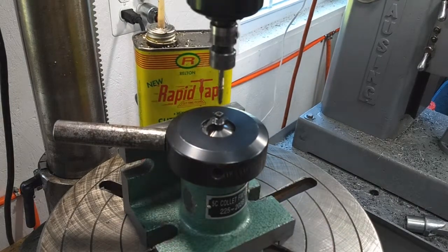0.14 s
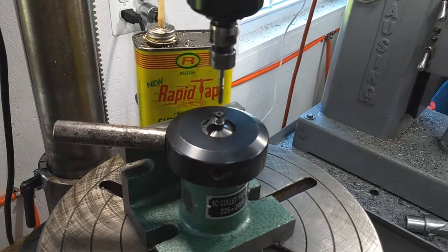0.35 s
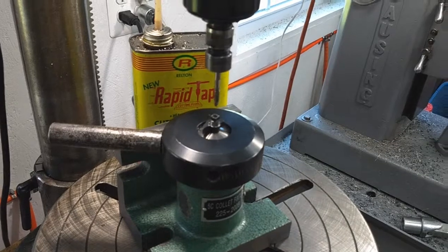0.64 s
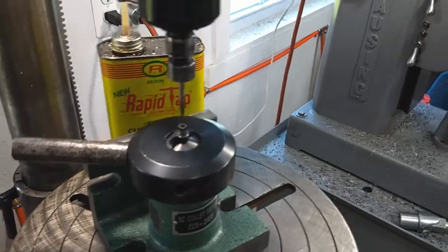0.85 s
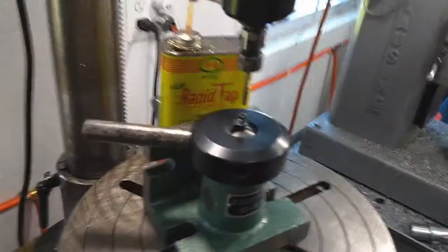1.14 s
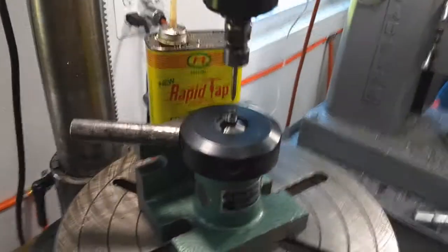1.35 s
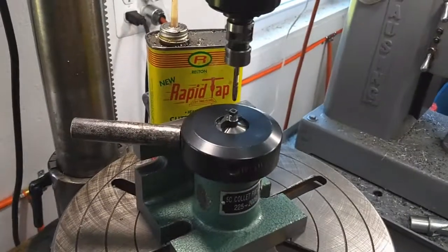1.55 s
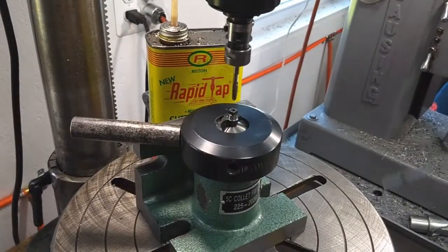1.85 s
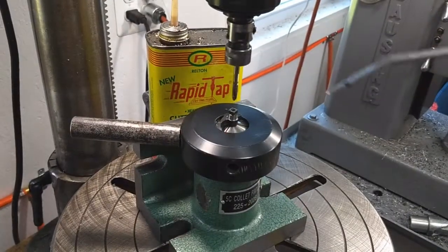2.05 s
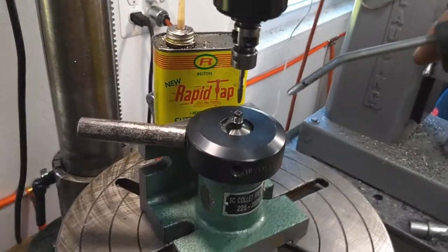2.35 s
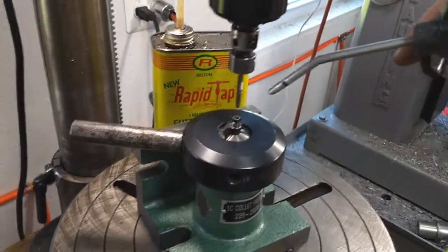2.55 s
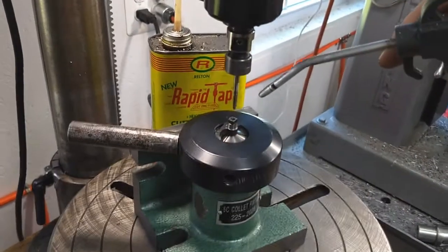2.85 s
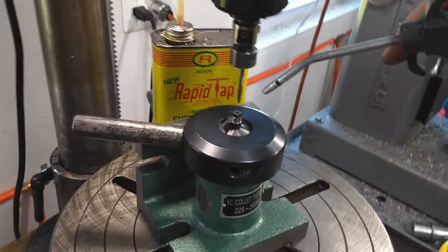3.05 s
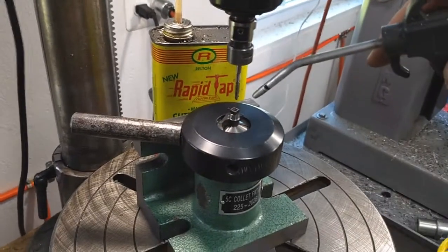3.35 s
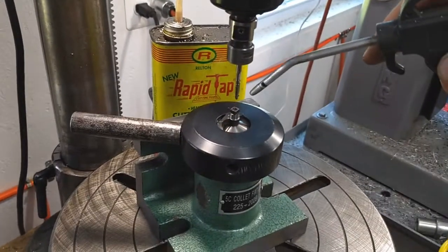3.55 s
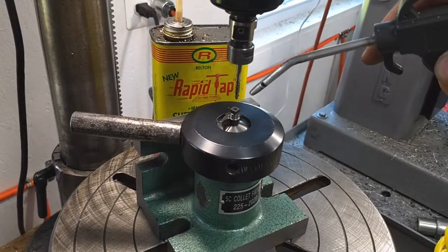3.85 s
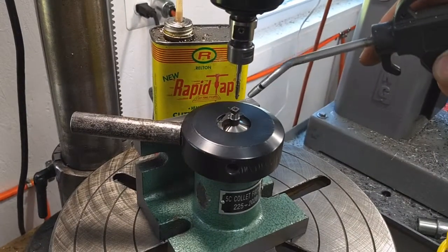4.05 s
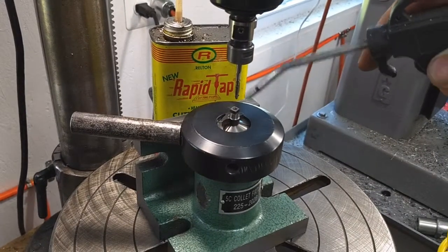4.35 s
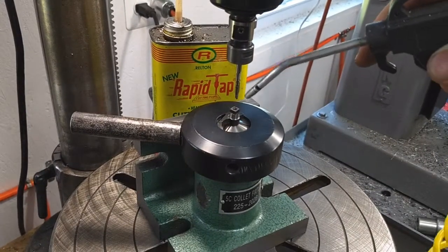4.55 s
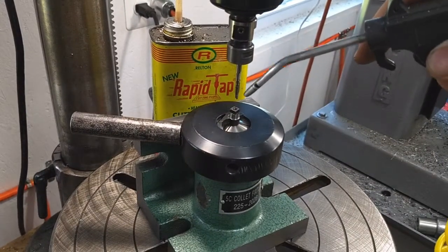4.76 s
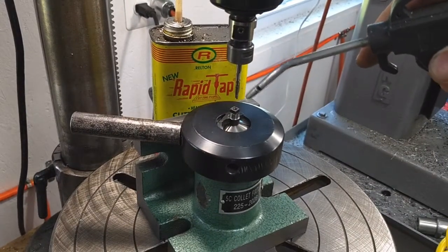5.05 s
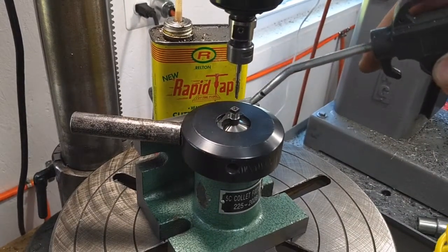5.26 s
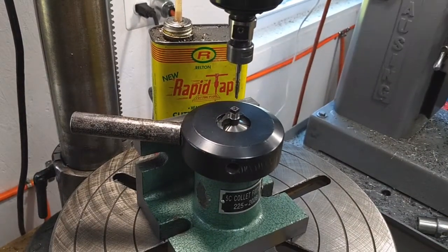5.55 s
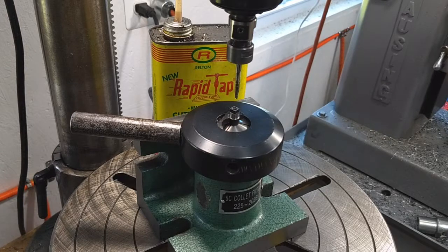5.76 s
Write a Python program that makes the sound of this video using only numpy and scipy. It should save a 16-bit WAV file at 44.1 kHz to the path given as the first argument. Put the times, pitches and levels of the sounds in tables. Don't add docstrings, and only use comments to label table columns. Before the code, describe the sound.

Close handheld stereo pickup, wide and phasey, of a machine spindle running down: fast gritty rattle, hard knocks and a droning casting thin into sparse contacts. Metal parts tick and a hand thumps the camera body. After a quiet stretch of fan and mains hum, three air blasts roar and hiss, each shorter, with a faint whistle, leaving a dull tail.

```python
import sys
import numpy as np
from scipy import signal
from scipy.fft import rfft, irfft, next_fast_len
from scipy.io import wavfile
from scipy.ndimage import map_coordinates

SR = 44100
rng = np.random.default_rng(int(sys.argv[2]) if len(sys.argv) > 2 else 0)


def generate_wav(sig):
    pcm = np.round(np.clip(np.atleast_2d(sig).T, -1, 1) * 32767).astype(np.int16)
    wavfile.write(sys.argv[1], SR, pcm)


def convert_level_to_amplitude(level_db):
    exponent = np.asarray(level_db, float) / 20
    return 10 ** exponent


N = 260627

# time in seconds, level in dB.
RATTLE_LEVEL = [
    (0, -39.5),
    (.6, -42),
    (.95, -40),
    (1.1, -46),
    (1.26, -45),
    (1.32, -47.5),
    (1.4, -44),
    (1.56, -50),
    (2.08, -50.5),
    (2.55, -61),
]
# frequency in Hz, density in dB per Hz.
SPINDLE_SPECTRUM = [(60, -6), (180, -11.5), (320, -8.5), (700, -6), (1500, -2.5), (2300, 5.5), (3000, -2),
                    (4500, -4.5), (7500, -1), (11000, -11.5), (13500, -24), (15700, -13)]
# centre in Hz, width in Hz, gain in dB.
CASTING_PEAKS = [(272, 45, 14.5), (358, 32, 12), (591.7, 43, 15), (694, 75, 5.5), (1267, 19, 12)]
# centre in Hz, width in Hz, gain in dB.
HEAD_PEAKS = [(2380, 660, 4), (6420, 650, 9.5), (8700, 250, -7.5)]
# frequency in Hz, density in dB per Hz.
BEARING_SPECTRUM = [(9000, -25), (11500, -15.5), (13700, -10), (14800, 2), (15800, -18)]
# time in seconds, peak in dB.
KNOCKS = [(0.0435, -19.5), (0.0824, -48), (0.161, -14), (0.2685, -16), (0.3112, -34), (0.3505, -20),
          (0.372, -21), (0.4035, -19.5), (0.4434, -23.5), (0.5144, -23), (0.5395, -16), (0.6689, -17.5),
          (0.7103, -28), (0.829, -14), (0.9068, -29), (1.35, -24), (1.4393, -41), (1.4735, -43),
          (1.97, -34), (2.02, -33), (2.1286, -37)]

# opening in seconds, shutting in seconds.
BURSTS = [
    (4.416, 4.94),
    (5.078, 5.172),
    (5.287, 5.35),
]
# time in seconds, flow in dB, aim at the microphone in dB.
FLOW = [
    [(4.426, -17, -1.5), (4.54, -21.5, 0.5), (4.716, -19.5, -3.5), (4.766, -19.5, -6), (4.822, -17, -14),
     (4.932, -22.5, -0.5)],
    [(5.088, -18.5, -11), (5.165, -20, 4)],
    [(5.296, -22.5, -7), (5.343, -22, 5)],
]
# squeeze in seconds, whistle in dB, room echo re last flow in dB,
# jet in dB at a flow of -18 dB.
TRIGGER = [
    (0.031, -23, -17, -18),
    (0.019, -20, -21.5, -17.5),
    (.022, -35, -19, -15),
]
# frequency in Hz, density in dB per Hz.
JET_SPECTRUM = [(30, -18.5), (80, -6), (200, -5.5), (500, -3.5), (1200, -4.5), (3000, -6), (5500, -15),
                (8000, -20), (10500, -34), (13300, -26), (14100, -30.5), (15700, -11.5)]
# frequency in Hz, density in dB per Hz.
HISS_SPECTRUM = [(60, -17.5), (200, -19.5), (700, -23.5), (2000, -10), (5000, -1), (8000, -4), (11000, -10),
                 (15700, -9.5)]
# frequency in Hz, density in dB per Hz.
WHISTLE_SPECTRUM = [(4500, -32), (5900, -13), (6500, 0), (7200, -9), (9000, -32)]
# frequency in Hz, density in dB per Hz.
WIND_SPECTRUM = [(20, -19), (80, 4), (250, 6), (600, -6.5), (1500, -47)]
# time in seconds, centre in Hz, width in Hz, level in dB, t60 in seconds.
GUN_RINGS = [
    (4.382, 9460, 696, -42.5, .2),
    (5.37, 1180, 60.3, -56.5, 0.76),
]

# time in seconds, peak in dB, centre in Hz, t60 in seconds.
TICKS = [(0.983, -13.5, 6100, 0.096), (1.2604, -27.5, 3620, 0.15), (1.6794, -34.5, 2800, 0.26),
         (2.299, -40.5, 7440, 0.06), (2.369, -28, 3220, 0.054), (2.5356, -33, 2880, 0.082),
         (2.599, -32.5, 3300, 0.095), (2.737, -30.5, 3180, 0.13), (3.018, -37, 3370, 0.33),
         (3.0797, -34.5, 3660, 0.11), (3.3854, -57, 3390, 0.067)]
# frequency in Hz, level in dB, t60 in seconds.
LEVER_MODES = [
    (442, -36.5, 0.39),
    (620, -31, 0.6),
    (975, -36, 0.29),
]
# time in seconds, level in dB.
BUMPS = [
    (1.2, -37),
    (1.25, -33),
    (1.391, -39),
    (2.37, -30),
    (2.45, -39),
    (2.75, -34),
    (3.03, -28),
    (3.2, -35),
    (3.55, -42),
]
# frequency in Hz, density in dB per Hz.
BODY_SPECTRUM = [(20, -17), (50, 7), (90, 6), (170, 1), (300, -41), (600, -52)]
# time in seconds, level in dB.
SHOP_LEVEL = [(0, -52.5), (.97, -47), (1.03, -53), (1.5, -49), (2.2, -42), (3.5, -44), (3.65, -46),
              (4.39, -45.5), (4.43, -74), (5.4, -71), (5.91, -64)]
# frequency in Hz, density in dB per Hz.
FAN_SPECTRUM = [(30, -11), (60, -3), (200, 3), (500, -0.5), (1100, -7.5), (2000, -10.5), (4000, -13.5),
                (7000, -25), (11000, -32.5), (15700, -31.5)]
# centre in Hz, width in Hz, gain in dB.
DUCT_PEAKS = [(799, 124, 11.5), (1158, 33, 7.5), (1550, 70, 0.5)]

# frequency in Hz, level in dB.
LEAK_MID = [(30, -20.5), (500, -8.5), (1200, -20.5), (2300, -13), (4600, -11.5), (6500, -8.5), (9000, -7.5),
            (13500, -5.5), (13700, -37)]
# frequency in Hz, level in dB.
LEAK_SIDE = [(300, -32), (1200, -10.5), (3500, -10.5), (9000, -4.5), (13500, -11.5), (13700, -10),
             (15800, -14)]
# frequency in Hz, gain in dB.
CLOSE_GAIN = [(2500, -9), (5000, -3), (8000, 0), (13500, 0), (13700, -20)]

START_PER_S, SLOWING_PER_S2 = 48, 14.5
STOP_S, STOPPING_S = 2.617, 0.2
CASTING_DB, CASTING_FOLLOWS = -36, 0.31
BEARING_DB, BEARING_FOLLOWS = -37, 1.45
KNOCK_T60_S = 0.043
JOLT_DB, JOLT_FOLLOWS, JOLT_RISE_S, JOLT_T60_S = -38, 1, 0.014, 0.17
DUCK_DB, DUCK_S, DUCK_WIDTH_S = -7, 1.103, 0.067
CRACKLE_PER_S, CRACKLE_DB, CRACKLE_SPREAD_DB, CRACKLE_T60_S = 45, 4, 4, 0.008

RELEASE_S = 0.025
ECHO_T60_S, ECHO_DULL = 0.97, 0.39
WHISTLE_ECHO_DB, WHISTLE_T60_S = -5.5, 0.7
JET_FOLLOWS, WHISTLE_FOLLOWS = 0.8, 0.8
WHISTLE_LAG_DB, WHISTLE_BUILD_S = -9, 0.12

TICK_TREBLE_DB, TICK_SNAP, SNAP_T60_S = -9, 0.48, 0.02
BUMP_T60_S = 0.3
LAG_S = 19 / 44100
MONO_HZ, TOP_HZ = 13600, 15850


def unit(x):
    return x / np.sqrt(np.mean(x ** 2) + 1e-20)


def along(points, hz):
    f, v = np.transpose(points)
    return np.interp(np.log(hz + 1), np.log(f + 1), v)


def curves(rows):
    s, *cols = np.transpose(rows)
    return [np.interp(np.arange(N) / SR, s, c) for c in cols]


def wobble(knots_per_s):
    return map_coordinates(rng.standard_normal(int(N * knots_per_s / SR) + 4), [np.arange(N) * knots_per_s / SR])


def filtered(x, response):
    m = next_fast_len(N + SR // 2)
    return irfft(rfft(x, m) * response(np.fft.rfftfreq(m, 1 / SR)), m)[..., :N]


def colour(spectrum, peaks=()):
    def response(hz):
        peaks_db = sum(db / (1 + (2 * (hz - c) / w) ** 2) for c, w, db in peaks)
        return convert_level_to_amplitude(along(spectrum, hz) + peaks_db)
    return response


def resonance(hz, width_hz):
    return lambda f: 1j * f * width_hz / (hz * hz - f * f + 1j * f * width_hz)


def ports(alike):
    a, b = rng.standard_normal((2, N))
    alike = np.clip(alike, 0, 1)
    return np.array([a, alike * a + np.sqrt(1 - alike ** 2) * b])


def decays(rows, rise_s):
    env, t = np.zeros(N + SR), np.arange(SR) / SR
    for s, db, t60 in rows:
        env[round(s * SR):][:SR] += convert_level_to_amplitude(db - 60 * t / t60) * (1 - np.exp(-t / rise_s))
    return env[:N]


def clutch_contacts():
    t = np.arange(N) / SR
    rate_per_s = np.maximum(START_PER_S - SLOWING_PER_S2 * t, 0)
    turns = np.cumsum(rate_per_s) / SR + 0.046 * wobble(14)
    swell = np.sin(np.pi * (turns % 1) ** 0.7) ** 4
    pulse = 1 + 0.6 * convert_level_to_amplitude(3.5 * wobble(30)) * swell
    return pulse * convert_level_to_amplitude(1.0 * wobble(350))


def spindle():
    t = np.arange(N) / SR
    rattle_db, = curves(RATTLE_LEVEL)
    change_db = rattle_db + 40
    turning = np.clip((STOP_S - t) / STOPPING_S, 0, 1)
    pulse = clutch_contacts()
    head = colour(SPINDLE_SPECTRUM, HEAD_PEAKS)
    body = colour(SPINDLE_SPECTRUM, CASTING_PEAKS)
    upper = lambda hz: 1 / (1 + (1700 / (hz + 1)) ** 4)

    rattle = unit(filtered(unit(pulse) * ports(0.69), lambda hz: head(hz) * upper(hz)))
    bearing_pulse = unit(pulse * convert_level_to_amplitude(3.0 * wobble(25)))
    bearing = unit(filtered(bearing_pulse * ports(0.54), colour(BEARING_SPECTRUM)))

    sway = convert_level_to_amplitude(1.6 * wobble(10))
    drone = unit(filtered(sway * ports(0.3), lambda hz: body(hz) * (1 - upper(hz))))
    duck_db = DUCK_DB * np.exp(-((t - DUCK_S) / DUCK_WIDTH_S) ** 2)
    jolt_rows = [(s, JOLT_DB + JOLT_FOLLOWS * (db + 17.5), JOLT_T60_S) for s, db in KNOCKS]
    jolts = decays(jolt_rows, rise_s=JOLT_RISE_S)
    drone_gain = convert_level_to_amplitude(CASTING_DB + CASTING_FOLLOWS * change_db + duck_db) + jolts
    casting = drone_gain * drone * convert_level_to_amplitude([[0], [-3]])

    knocks = decays([(s - 0.004, db, KNOCK_T60_S) for s, db in KNOCKS], rise_s=0.01)
    blows = unit(filtered(ports(0.48), head)) + convert_level_to_amplitude(-9.0) * bearing
    bearing_gain = convert_level_to_amplitude(BEARING_DB + BEARING_FOLLOWS * change_db)
    running = convert_level_to_amplitude(rattle_db + 7) * rattle + casting + bearing_gain * bearing
    return turning * running + convert_level_to_amplitude(2.5) * knocks * blows


def crackle():
    rattle_db, = curves(RATTLE_LEVEL)
    draw = rng.random((round(CRACKLE_PER_S * STOP_S), 2))
    rows = []
    for s, u in draw * [STOP_S - 0.1, 1]:
        over_db = CRACKLE_DB - CRACKLE_SPREAD_DB * np.log(1 - u)
        rows.append((s, rattle_db[round(s * SR)] + over_db, CRACKLE_T60_S))
    treble = lambda hz: hz ** 2 / (hz ** 2 + 5000 ** 2)
    return convert_level_to_amplitude(0.5) * filtered(decays(rows, rise_s=0.0003) * ports(0.5), treble)


def valve(opening_s, closing_s):
    t = np.arange(N) / SR
    return sum(np.clip((t - a) / opening_s, 0, 1) * np.clip((b - t) / closing_s, 0, 1) for a, b in BURSTS)


def jet_and_wind():
    t = np.arange(N) / SR
    flow_db, aim_db = curves(np.vstack(FLOW))
    burst = np.searchsorted([b + 0.05 for a, b in BURSTS[:-1]], t)
    jet_db = np.array(TRIGGER)[burst, -1] + JET_FOLLOWS * (flow_db + 18)
    jet = unit(filtered(convert_level_to_amplitude(0.98 * wobble(160)) * ports(1.0), colour(JET_SPECTRUM)))
    lumps = convert_level_to_amplitude(2.5 * wobble(40))
    gusts = unit(filtered(lumps * ports(0.5), colour(WIND_SPECTRUM))) * convert_level_to_amplitude([[-10], [0]])
    wind = gusts + [[0.3], [1.8]]
    return valve(0.002, 0.0079) * (convert_level_to_amplitude(jet_db) * jet + convert_level_to_amplitude(flow_db + aim_db) * wind)


def nozzle_gains():
    t, hiss, echo, whistle = np.arange(N) / SR, 0, 0, 0
    for rows, (squeeze_s, whistle_db, echo_db, _) in zip(FLOW, TRIGGER):
        flow_db, full_s, end_s = curves(rows)[0], rows[0][0], rows[-1][0]
        squeeze_db = -20 * (np.maximum(full_s - t, 0) / squeeze_s) ** 2
        edge_db = squeeze_db - 20 * np.maximum(t - end_s, 0) / RELEASE_S
        mean_db = flow_db[round(full_s * SR):round(end_s * SR)].mean()
        lag_db = WHISTLE_LAG_DB * np.exp(-np.maximum(t - full_s, 0) / WHISTLE_BUILD_S)
        tone_db = whistle_db + lag_db + WHISTLE_FOLLOWS * (flow_db - mean_db)
        tone_end_db = tone_db[round(end_s * SR)] + WHISTLE_ECHO_DB
        hiss = hiss + convert_level_to_amplitude(flow_db + edge_db)
        echo = echo + decays([(end_s, flow_db[-1] + echo_db, ECHO_T60_S)], rise_s=0.011)
        whistle = whistle + convert_level_to_amplitude(tone_db + edge_db) + decays([(end_s, tone_end_db, WHISTLE_T60_S)], rise_s=0.01)
    return hiss, echo, whistle


def nozzle():
    t = np.arange(N) / SR
    hiss_gain, echo_gain, whistle_gain = nozzle_gains()
    hiss = unit(filtered(convert_level_to_amplitude(0.37 * wobble(90)) * ports(0.33), colour(HISS_SPECTRUM)))
    dull = filtered(hiss, lambda hz: 0.25 + 0.67 / (1 + (hz / 8000) ** 4))
    late = np.clip((t - 5.3) / 0.28, ECHO_DULL, 1)
    echo = (1 - late) * hiss + late * dull
    whistle = unit(filtered(convert_level_to_amplitude(2.0 * wobble(60)) * ports(0.6), colour(WHISTLE_SPECTRUM)))
    return hiss_gain * hiss + echo_gain * echo + whistle_gain * whistle


def gun_rings():
    out = 0
    for s, hz, width_hz, db, t60 in GUN_RINGS:
        ring = unit(filtered(ports(0.79), resonance(hz, width_hz)))
        out = out + decays([(s, db, t60)], rise_s=0.004) * ring
    return out


def air_gun():
    return jet_and_wind() + nozzle() + gun_rings()


def ticks():
    out = np.zeros((2, N))
    for s, db, hz, t60 in TICKS:
        snap = TICK_SNAP * decays([(s, db, SNAP_T60_S)], rise_s=0.0005)
        puff = (decays([(s, db - 4.5, t60)], rise_s=0.0012) + snap) * ports(0.31)
        pitch = resonance(0.9 * hz, 0.9 * hz)
        out += filtered(puff, lambda f: 1.9 * pitch(f) ** 2 + convert_level_to_amplitude(TICK_TREBLE_DB) * f / (f + 4000))
    t = np.maximum(np.arange(N) / SR - TICKS[0][0], 0)
    lever = sum(convert_level_to_amplitude(db - 60 * t / t60) * np.sin(2 * np.pi * hz * t) for hz, db, t60 in LEVER_MODES)
    return out + lever


def handling():
    bumps = decays([(s, db, BUMP_T60_S) for s, db in BUMPS], rise_s=0.011)
    return bumps * unit(filtered(ports(0.9), colour(BODY_SPECTRUM))) * convert_level_to_amplitude([[-6], [0]])


def fan():
    sway = convert_level_to_amplitude(0.9 * wobble(9))
    return convert_level_to_amplitude(curves(SHOP_LEVEL)[0]) * unit(filtered(sway * ports(0.66), colour(FAN_SPECTRUM, DUCT_PEAKS)))


def hum():
    phase = 2 * np.pi * 120 * np.arange(N) / SR + 0.3 * wobble(9.4)
    mid = convert_level_to_amplitude(-2.0 + 0.98 * wobble(8.6)) * np.sin(phase)
    side = convert_level_to_amplitude(-4 + 1.5 * wobble(14)) * np.sin(phase + 1.74)
    return convert_level_to_amplitude(curves(SHOP_LEVEL)[0]) * np.array([mid, side])


def diffuse(x, size=256):
    z = signal.stft(x, nperseg=size)[2]
    scatter = np.exp(2j * np.pi * rng.random(z.shape))
    return 1.69 * signal.istft(z * scatter, nperseg=size)[1][:, :N]


def drop_weaker(pair, margin_db, rest_db, size=2048, count=12):
    z = signal.stft(pair, nperseg=size)[2]
    band = np.arange(z.shape[1]) // count
    power = np.add.reduceat(abs(z) ** 2, np.arange(0, len(band), count), axis=1)
    weak = (power < power[::-1] * convert_level_to_amplitude(2 * margin_db))[:, band]
    weak[:, :3 * count] = False
    return signal.istft(z * np.where(weak, convert_level_to_amplitude(rest_db), 1), nperseg=size)[1][:, :N]


def scene():
    preamp_hiss = convert_level_to_amplitude(-80) * ports(0)
    return spindle() + crackle() + air_gun() + ticks() + handling() + fan() + preamp_hiss


def band_limit(x):
    return signal.sosfilt(signal.butter(12, 17030, fs=SR, output="sos"), x)


def record(dry):
    below = lambda hz, edge_hz: 0.5 - 0.5 * np.tanh((hz - edge_hz) / 40)
    cut = lambda hz: -hz ** 2 / (42 ** 2 - hz ** 2 + 1j * hz * 45) * below(hz, TOP_HZ)

    def widener(hz):
        centre = convert_level_to_amplitude(-9.5) / (1 + (hz / 700) ** 2)
        comb = np.array([1j * (np.sin(np.pi * hz * LAG_S) + centre), np.cos(np.pi * hz * LAG_S)])
        wide = below(hz, MONO_HZ)
        return (comb * wide + (1 - wide) * np.array([[1], [0]])) * cut(hz)

    leak_gain = lambda hz: convert_level_to_amplitude([along(LEAK_MID, hz), along(LEAK_SIDE, hz)]) * cut(hz)
    far = filtered(diffuse(dry), leak_gain)
    near = filtered(far, lambda hz: convert_level_to_amplitude(along(CLOSE_GAIN, hz)))
    blowing = np.interp(np.arange(N) / SR, [4.41, 4.44, 5.5, 5.7], [0, 1, 1, 0])
    leak = (1 - blowing) * far + blowing * near
    pair = filtered(dry, widener) + leak + hum()
    mid, side = drop_weaker(pair, margin_db=-10.5, rest_db=-30)
    both = np.array([mid + side, mid - side])
    both = both / (1 + abs(both / 0.95) ** 6) ** (1 / 6)
    return band_limit(both)


dry = scene()
out = record(dry)
generate_wav(out)
```